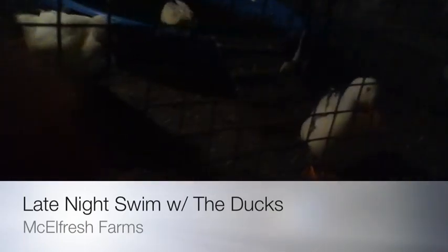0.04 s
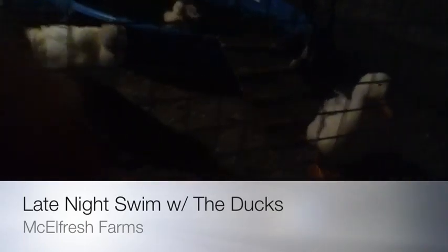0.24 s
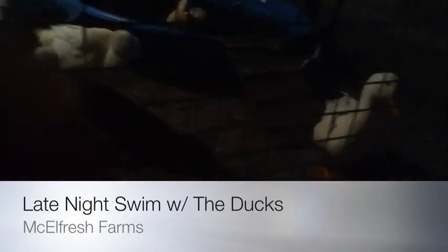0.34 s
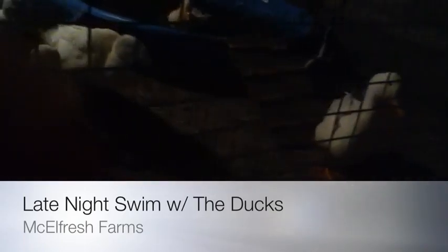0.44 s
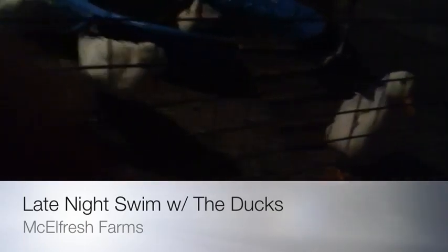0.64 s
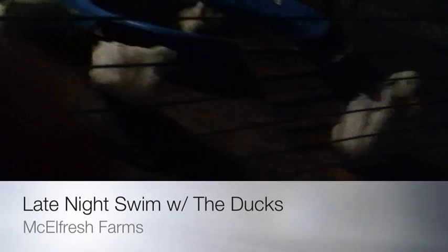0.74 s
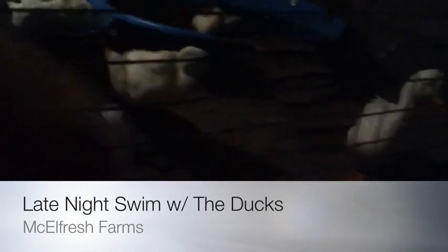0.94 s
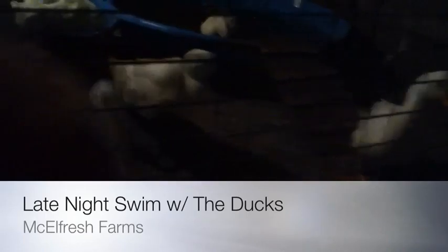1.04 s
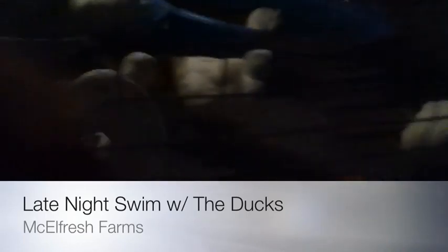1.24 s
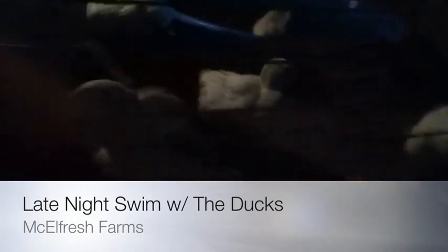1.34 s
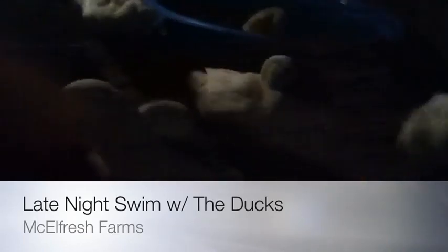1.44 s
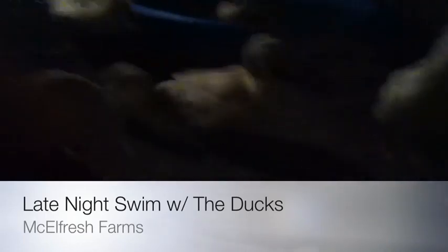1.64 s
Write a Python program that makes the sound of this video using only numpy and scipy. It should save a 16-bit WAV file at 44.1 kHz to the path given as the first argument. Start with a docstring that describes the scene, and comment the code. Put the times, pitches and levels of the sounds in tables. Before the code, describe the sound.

Ducks in a night pen by a small pool: sharp close quacks come in pairs, distorting slightly at their loudest, answered by duller distant quacks and grunts over faint watery rustle and low hum.

```python
"""Ducks quack in a pen beside a small pool, some close to the microphone and some farther off.
A quack is a short run of slow throat pulses that ring the bill and windpipe; near birds are bright,
far ones rasp dully, and grunts come from shut bills. Walls throw the voices and soft knocks back.
Splashes are bursts of hiss, water and feathers a patchy rustle, and two wavering tones a low hum.
The loudest pulses overload the input."""
import sys
import numpy as np
from scipy import signal
from scipy.io import wavfile
from scipy.ndimage import uniform_filter1d

SR = 44100
rng = np.random.default_rng(int(sys.argv[2]) if len(sys.argv) > 2 else 0)


def transcribe(signal):
    """Save signal, clipped to [-1, 1], as a 16-bit WAV file at the path in sys.argv[1]."""
    frames = np.atleast_2d(signal).T
    limited = np.clip(frames, -1, 1)
    pcm = np.round(limited * 32767).astype(np.int16)
    wavfile.write(sys.argv[1], SR, pcm)


def how_loud(loudness_db):
    """Turn decibels into a plain amplitude multiplier (0 dB gives 1, 20 dB gives 10)."""
    steps = np.asarray(loudness_db, float) / 20
    return 10 ** steps


N = 74970


def evened(x):
    """Scales to rms 1."""
    return x / np.sqrt(np.mean(x ** 2) + 1e-20)


def read(points, hz):
    """Reads a table on a log-frequency axis."""
    f, value = np.transpose(points)
    return np.interp(np.log(hz + 1), np.log(f + 1), value)


def add(mix, s, sound):
    """Adds a sound at time s."""
    part = mix[max(round(s * SR), 0):][:len(sound)]
    part += sound[:len(part)]


def quack(start_s, length_s, peak_db, pulse_hz, peak_at, bill, rings, first_db, last_db,
          rise_s, t60_s, jitter_s, puff_db=-90, far=0):
    """Each throat pulse rings the same resonances, a little differently, with a puff of noise."""
    v = np.linspace(0, 1, round(length_s * pulse_hz) + 1)
    # pulses come slower at both ends, slowest at the last
    places = v + .1 * np.sin(2 * np.pi * v) / (2 * np.pi) + .06 * (v ** 4 - v)
    peak_at = np.clip(peak_at, .05, .95)
    flat_top = 1.585
    rising = first_db * abs(1 - v / peak_at) ** flat_top
    falling = last_db * abs((v - peak_at) / (1 - peak_at)) ** flat_top
    levels = peak_db + np.where(v < peak_at, rising, falling)

    ring_hz, ring_db, tail_db = np.transpose(rings)[:, :, None]
    t = np.arange(3000) / SR
    swell = 1 - np.exp(-(t / rise_s) ** 2)
    decay = how_loud(-60 * (t - rise_s) / t60_s)
    tail = how_loud(tail_db - 60 * t * pulse_hz / 5.5)  # falls 60 dB in 5.5 pulse periods
    shape = swell * (decay + tail)
    spread_db = 1.5 + far * 1.5
    phase_spread = far * np.pi + .00035 * ring_hz  # radians
    out = np.zeros(N)
    for place, pulse_db in zip(places, levels):
        level_draw, pitch_draw, phase_draw = rng.standard_normal((3, len(rings), 1))
        # soft pulses lose treble faster; a far call is judged against its own peak
        dull_db = 0.24 * (pulse_db - far * peak_db) * (ring_hz > 2400)
        ring = how_loud(ring_db + dull_db + spread_db * level_draw) * shape
        # far rings sink as a call softens
        opening = bill + .008 * far * (pulse_db - peak_db)
        hz = ring_hz * opening * (1 + .02 * pitch_draw)
        # apart from the random phases, rings line up after 0.001058 s
        ring *= np.cos(2 * np.pi * hz * (t - 0.001058) + phase_spread * phase_draw)
        noise = uniform_filter1d(rng.standard_normal(len(t)), size=1 + 4 * far)
        puff = how_loud(puff_db + dull_db[-1]) * np.exp(-t / (0.0028 + far * rise_s)) * noise
        when_s = start_s - far * rise_s / 2 + place * length_s + jitter_s * rng.standard_normal()
        add(out, when_s, how_loud(pulse_db) * (puff - ring.sum(0)))
    return out


def near_birds():
    """Sharp pulses ring open bills close to the microphone, treble and all."""
    # quacks: start_s, length_s, peak_db, pulse_hz, bill opening (factor on the rings)
    near_calls = [(0.2752, 0.045, -9, 120, 0.94), (0.3847, .033, -2, 182, 1.04),
                  (0.5615, .041, -4, 98, 1.035), (0.6682, .038, -4, 159, 1.04),
                  (1.0699, 0.055, -5.5, 141, 1), (1.1757, .034, -3, 177, 1.05), (1.357, .023, -5, 99, .98),
                  (1.676, 0.021, -21, 137, 0.89)]
    # resonances of bill and windpipe: ring_hz, level_db, lingering tail_db
    near_rings = [(159, -25, -14.5), (581, -14, -10), (950, -16.5, -7.5), (1274, -0.5, -7),
                  (1560, -0.5, -39), (1938, -3.5, -25), (2650, -8.5, -23), (3473, -10.5, -18),
                  (4060, -13.5, -18), (4840, -16, -25), (5550, -19.5, -32), (6240, -20.5, -30),
                  (7310, -28, -35), (8350, -31, -33)]
    return sum(quack(start_s, length_s, peak_db, pulse_hz, 0.33, bill, near_rings, -8, -10,
                     rise_s=.0007, t60_s=.011, jitter_s=.0003, puff_db=-33.5)
               for start_s, length_s, peak_db, pulse_hz, bill in near_calls)


def far_birds():
    """Slower swells, scattered phases and smoothed noise make distant calls rasp dully."""
    # quacks: start_s, length_s, peak_db, pulse_hz, place of the peak (0-1), bill opening (factor)
    far_calls = [(.003, 0.026, -32.5, 130, 0, 0.91), (0.056, 0.032, -33, 80, 0.36, 1.13),
                 (0.101, .08, -46, 90, 0.85, .8), (.201, 0.058, -16.5, 62, 0.9, .97),
                 (0.335, 0.032, -19.5, 110, 0.16, 0.98), (0.609, .012, -17, 85, .2, 0.93),
                 (0.634, 0.036, -18, 105, .2, 1.07), (0.829, 0.054, -13, 91, 0.53, 1.08),
                 (0.904, .02, -31, 130, 0.49, 1.52), (.921, .038, -27, 80, .9, 1.23),
                 (1.006, .043, -14.5, 95, .95, 1.07), (1.036, .029, -14.5, 110, 0.58, 1.22),
                 (1.129, 0.034, -25, 130, 0.03, 0.97), (1.400, .062, -17.5, 65, 0.24, 1.006),
                 (1.478, .077, -19, 65, 0.5, 1.04), (1.649, 0.011, -22.5, 90, 0, 1.19)]
    # resonances heard from afar: ring_hz, level_db, lingering tail_db
    far_rings = [(1200, -12, -16), (1380, -5, -16), (1620, -1, -16), (1950, -7, -18), (2250, -15, -25),
                 (3000, -27, -30), (4300, -23, -18), (4750, -24, -20)]
    return sum(quack(*call, far_rings, -9, -6.5, rise_s=.0025, t60_s=.028, jitter_s=.0006,
                     puff_db=-11.5, far=1) for call in far_calls)


def grunts():
    """Throat pulses behind a shut bill ring only low resonances."""
    # grunts: start_s, length_s, peak_db, pulse_hz, place of the peak (0-1)
    grunt_calls = [(.259, 0.11, -25, 190, 0.46), (.602, 0.016, -20.5, 190, 0),
                   (.640, 0.093, -28.5, 165, 0.97), (1.053, 0.096, -23, 155, 0.2),
                   (1.165, 0.051, -25, 190, .7), (1.357, .045, -28, 180, 0.38),
                   (1.610, 0.027, -36, 185, 0.36), (1.672, .027, -31, 150, 0.8)]
    # resonances with the bill shut: ring_hz, level_db, lingering tail_db
    grunt_rings = [(168, -9.5, -15.5), (344, -22, -62), (608.5, 1.5, -4), (800, -26, -51)]
    return sum(quack(*call, 0.95, grunt_rings, -4.5, -16.5, rise_s=0.00057, t60_s=.025,
                     jitter_s=0.00056) for call in grunt_calls)


def soft_note():
    """One soft, clear note glides with a slight waver, its octave above it."""
    # the note: start_s, length_s, level_db, first_hz, last_hz
    start_s, length_s, level_db, first_hz, last_hz = (1.632, .042, -35, 760, 620)
    v = np.arange(0, 1, 1 / (length_s * SR))
    waver_hz = 200 * uniform_filter1d(rng.standard_normal(len(v)), size=100)
    hz = first_hz + (last_hz - first_hz) * v ** 2 + waver_hz
    phase = 2 * np.pi * np.cumsum(hz) / SR
    out = np.zeros(N)
    add(out, start_s, how_loud(level_db) * np.sin(np.pi * v) ** .5 * (np.sin(phase) + .3 * np.sin(2 * phase)))
    return out


def knocks():
    """Feet and bodies knock softly: each a dying, dull ring of unsteady pitch."""
    # knocks: start_s, level_db, ring_hz, t60_s
    thuds = [(.145, -42, 458, 0.14), (0.951, -37, 234, 0.067), (1.015, -39, 379.9, 0.039),
             (0.1958, -22.5, 920, 0.017), (.202, -29.5, 450, 0.028), (.808, -27, 586, 0.026),
             (0.819, -32, 284, 0.12), (1.612, -36, 502, 0.033)]
    out, t = np.zeros(N), np.arange(4000) / SR
    for start_s, level_db, hz, t60_s in thuds:
        wobbly_s = np.cumsum(1 + 1.62 * uniform_filter1d(rng.standard_normal(len(t)), 60)) / SR
        add(out, start_s, how_loud(level_db - 60 * t / t60_s) * np.sin(2 * np.pi * hz * wobbly_s))
    return out


def walls(x):
    """Sparse echoes of random sign, each band dying at its own speed."""
    # dying of the echoes: band_hz, t60_s
    wall_decay = [(200, 0.21), (600, 0.083), (1300, 0.28), (2000, 0.19), (4000, 0.2), (8000, 0.18)]
    # colour of the echoes: band_hz, level_db
    wall_colour = [(200, 5), (700, 0), (1300, 2.5), (2200, 0.5), (4500, 7.5), (10000, 11.5)]
    taps = np.zeros(SR // 2)
    at = np.arange(300, len(taps) - 20, 20)
    taps[at + rng.integers(0, 20, at.shape)] = rng.choice([-1., 1.], at.shape)
    hz, t, z = signal.stft(taps, SR, nperseg=128)
    echo_db = read(wall_colour, hz)[:, None] - 60 * t / read(wall_decay, hz)[:, None]
    tail = signal.istft(z * how_loud(echo_db), SR, nperseg=128)[1]
    # level reference: the same taps dying with a 0.4 s t60
    reference = np.linalg.norm(taps * how_loud(-60 * np.arange(len(taps)) / SR / .4))
    return signal.fftconvolve(x, tail / reference)[:N]


def splashes():
    """Water splashes are grainy, band-limited bursts of hiss that swell and fade."""
    # bursts: start_s, length_s, level_db (rms before the fades), hiss_hz (sets the band edges)
    bursts = [(0.158, 0.076, -42, 9000), (0.366, 0.022, -41.5, 10000), (0.785, 0.058, -42, 7000),
              (0.871, 0.018, -42.5, 8020), (0.944, 0.03, -42.5, 7000), (1.295, 0.033, -68, 7000),
              (1.531, 0.08, -42.5, 8100), (1.647, 0.044, -45.5, 9000)]
    out = np.zeros(N)
    for start_s, length_s, level_db, hz in bursts:
        n = round(length_s * SR)
        band = signal.butter(1, [hz * 0.13, min(hz * 1.1, 20000)], "band", fs=SR, output="sos")
        grain = how_loud(2.4 * uniform_filter1d(rng.standard_normal(n), 40) * 4.4)
        hiss = evened(signal.sosfilt(band, grain * rng.standard_normal(n)))
        add(out, start_s, how_loud(level_db) * np.hanning(n) * hiss)
    return out


def rustle():
    """Water and feathers: coloured noise, patchy in time and pitch, with flickering treble."""
    # spectrum of the rustle: band_hz, relative density_db (per Hz)
    rustle_colour = [(18, -47), (30, -18.5), (121, 2.5), (336, -24.5), (473, -5), (740, -12), (822, -5),
                     (1100, -1), (3400, -12.5), (6380, -17.5), (16000, -35)]
    frames, hz = N // 128 + 5, np.fft.rfftfreq(512, 1 / SR)
    real, imag, patches = rng.standard_normal((frames, 257, 3)).T
    patches = evened(uniform_filter1d(uniform_filter1d(patches, 8, 0), 12, 1))
    flicker = evened(uniform_filter1d(rng.standard_normal(frames), 3))
    level_db = read(rustle_colour, hz)[:, None]
    level_db = level_db + 2.5 * patches * (hz[:, None] > 300)
    level_db = level_db + 1.5 * flicker * (hz[:, None] > 2500)
    z = (real + 1j * imag) * how_loud(level_db)
    return how_loud(-43) * evened(signal.istft(z, nperseg=512, noverlap=384)[1][:N])


def hum():
    """Low tones waver as slow noise moves their two quadratures."""
    # tones: tone_hz, level_db (rms)
    tones = [(76, -63), (150, -56)]
    out, t = np.zeros(N), np.arange(N) / SR
    for hz, level_db in tones:
        drift = uniform_filter1d(rng.standard_normal((2, N)), 1500, axis=1)
        c, d = uniform_filter1d(drift, 1500, axis=1)
        tone = (0.026 + c) * np.cos(2 * np.pi * hz * t) + d * np.sin(2 * np.pi * hz * t)
        out += how_loud(level_db) * evened(tone)
    return out


def scene():
    """Near and far birds, knocks, their echo off the walls, and the background."""
    near, far = near_birds(), far_birds()
    low = grunts() + soft_note() + knocks()
    echo = walls(how_loud(-8.5) * (near + low)) + walls(how_loud(-6) * far)
    return (near + far + low + echo + splashes() + rustle() + hum())[None]


def low_pass(x):
    """Removes everything above the highest recorded frequency."""
    return signal.sosfilt(signal.butter(12, 16440, fs=SR, output="sos"), x)


def record(dry):
    """The microphone input clips at 0.93, then loses the deepest bass and highest treble."""
    clipped = np.clip(dry, -.93, .93)
    bass_cut = signal.butter(2, 55.4, "high", fs=SR, output="sos")
    thinned = signal.sosfilt(bass_cut, clipped)
    treble_cut = signal.firwin2(201, [0, 10200, 15800, 16300, SR / 2], [1, 1, how_loud(-21), 0, 0], fs=SR)
    mix = signal.oaconvolve(thinned, treble_cut[None], "same")
    return low_pass(mix)


dry = scene()
out = record(dry)
transcribe(out)
```